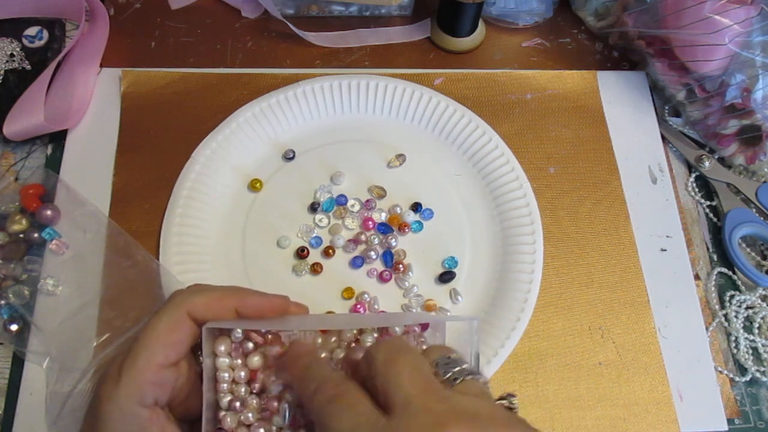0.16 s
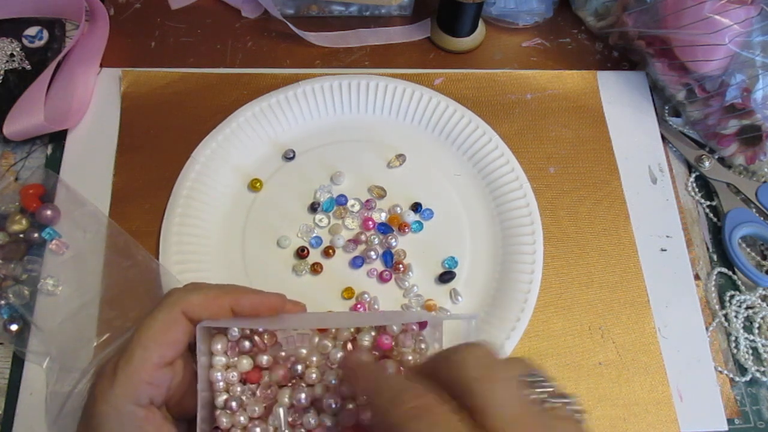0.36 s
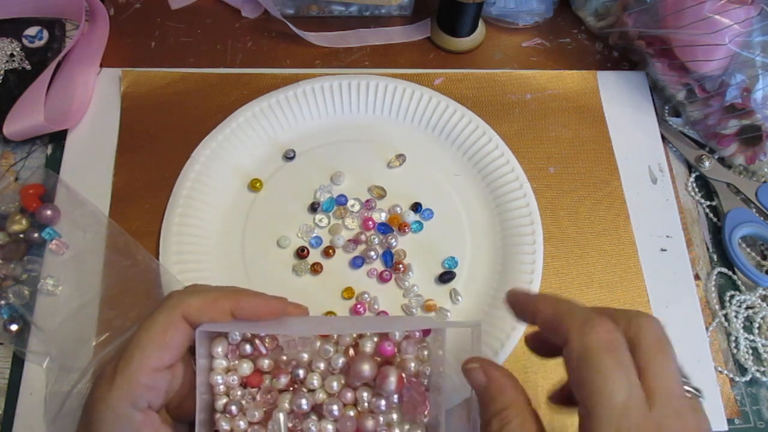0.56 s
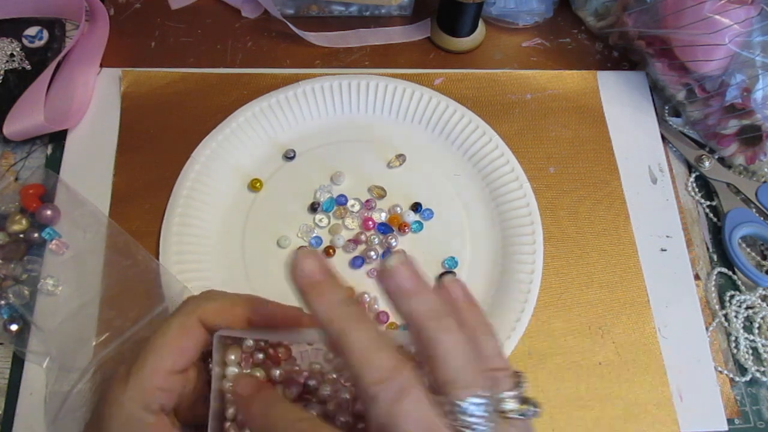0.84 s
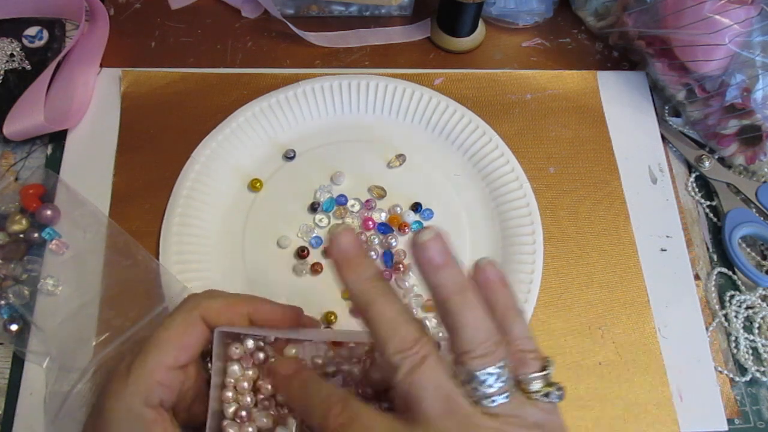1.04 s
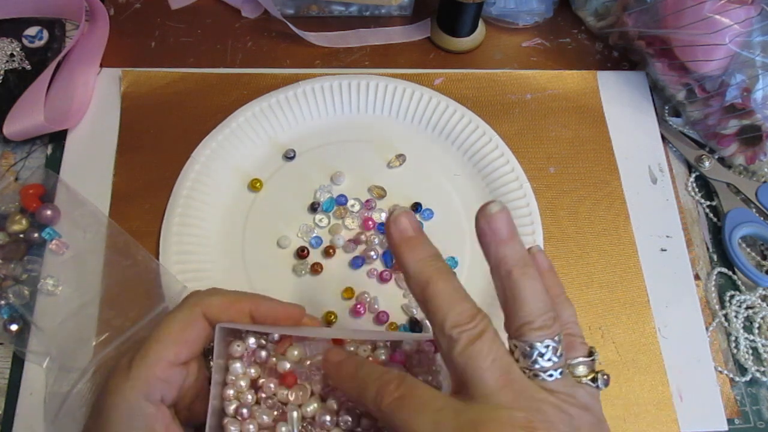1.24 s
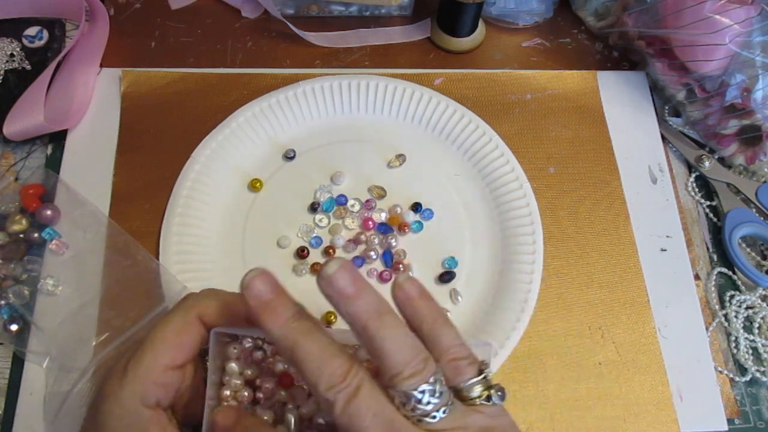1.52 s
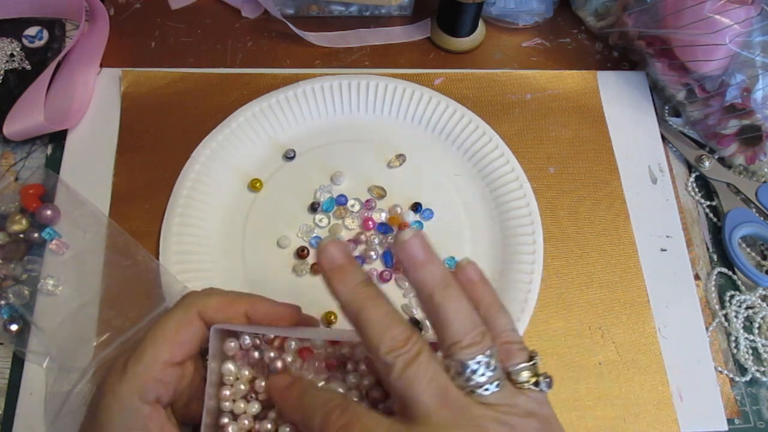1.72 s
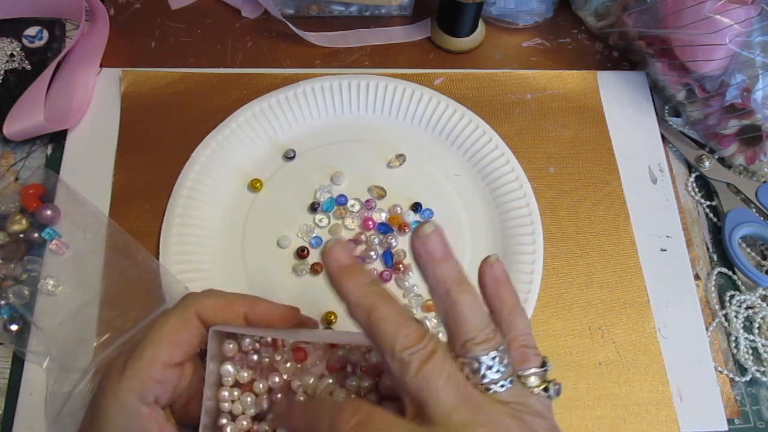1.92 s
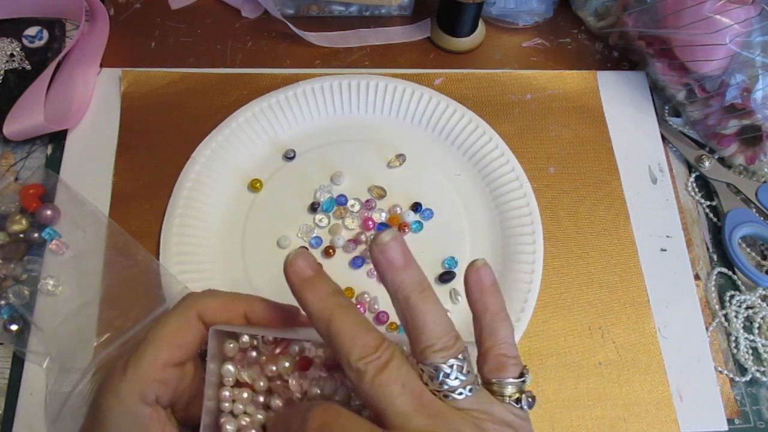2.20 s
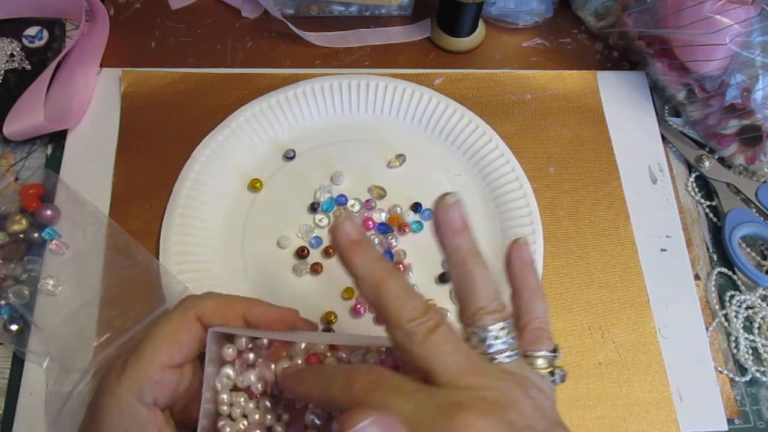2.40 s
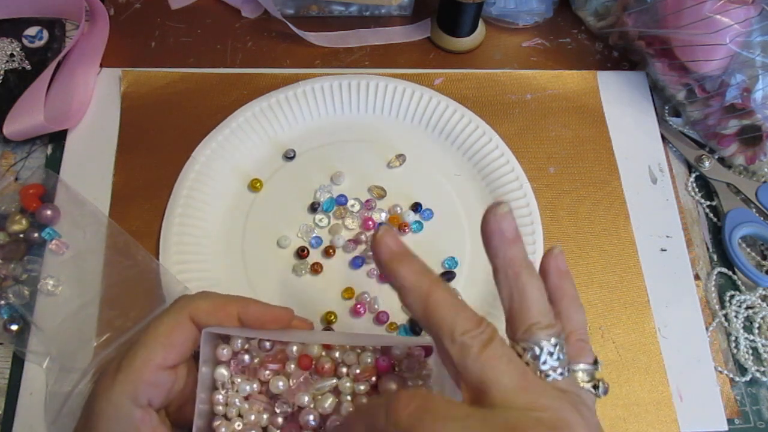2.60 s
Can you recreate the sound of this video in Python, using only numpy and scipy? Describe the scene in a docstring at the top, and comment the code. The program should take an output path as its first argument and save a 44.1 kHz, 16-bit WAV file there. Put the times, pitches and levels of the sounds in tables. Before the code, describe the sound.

Fingers stirring small hard beads in a plastic box, bright clattering in bursts with short pauses

```python
"""Pearl beads stirred in a small box

Fingers rummage through pearl beads in a small plastic box, held over a table in a small room.
Each contact is a short dying tone (the knock of the box) plus filtered noise bursts (the tick of the beads).
Single clicks stand out of a dense random rattle that follows the strokes; box and room ring on briefly.
Low noise makes the rubbing fingers and the quiet background, and a hand bumps the table once."""
import sys
import numpy as np
from scipy import signal
from scipy.fft import rfft, irfft, next_fast_len
from scipy.io import wavfile

SR = 44100
rng = np.random.default_rng(int(sys.argv[2]) if len(sys.argv) > 2 else 0)


def to_wav(s):
    """Save 16-bit WAV."""
    ch = np.atleast_2d(s).T  # columns
    pcm = np.round(np.clip(ch, -1, 1) * 32767)  # PCM
    wavfile.write(sys.argv[1], SR, pcm.astype(np.int16))


N = 121275
TIME = np.arange(N) / SR

# single bead clicks; brightness is the high part of the tick against its low part:
# start_s, knock_level_db, tick_level_db, brightness_db
BEAD_CLICKS = [(0.0331, -20.5, -34, -1), (0.0393, -26, -32, -14), (0.091, -33, -35.5, -5),
               (0.094, -23, -38, -1), (0.1128, -19.5, -25, -5), (0.1323, -14.5, -27, -4),
               (0.1459, -19, -41, -8), (0.1502, -25, -23.5, -3.5), (0.1676, -9.5, -28.5, -14),
               (0.1821, -24, -27, -11), (0.1962, -15.5, -26, -5.5), (0.2168, -22, -30, -1),
               (0.2455, -16, -22.5, -3), (0.272, -21, -42, -5), (0.2943, -34, -30.5, -2.5),
               (0.3107, -34, -35.5, -8), (0.3222, -32, -39, -7), (0.3376, -43, -34.5, -10),
               (0.356, -35, -40, -13), (0.3861, -53, -39, -7), (0.389, -31, -43, -6),
               (0.4178, -31.5, -29.5, 2.5), (0.4407, -42.5, -49, -5), (0.487, -40, -41.5, 7),
               (0.5291, -47.5, -52.5, -11), (0.747, -64, -55.5, -5), (0.9011, -46, -57, -3),
               (0.9193, -28.5, -32.5, -3), (0.9283, -24, -33, -6), (0.9311, -33, -30, -3.5),
               (0.9687, -28, -31, 9), (0.9805, -34, -29, 4), (0.9987, -31, -28, -4),
               (1.0036, -20, -27, -13), (1.0133, -28, -23, -11), (1.0271, -26, -30.5, -10),
               (1.0484, -20.5, -25.5, -10), (1.0558, -22, -22, -1), (1.0642, -22.5, -27, 5),
               (1.0699, -18, -25, -8), (1.0859, -26, -43, -2), (1.0923, -17.5, -36, 0),
               (1.1091, -17, -29.5, -15.5), (1.1203, -25, -32, -12), (1.1338, -27, -29.5, -9),
               (1.1736, -30, -32, -8), (1.1987, -26.5, -30, -8.5), (1.216, -29.5, -49, 1),
               (1.2225, -31, -36.5, 5), (1.3087, -30, -32.5, -12.5), (1.5166, -34.5, -33, -7),
               (1.5212, -16.5, -20.5, 2.5), (1.5629, -20, -30, -3), (1.5704, -29, -26, 4),
               (1.5778, -10.5, -18, -4), (1.5969, -14.5, -23, -2), (1.6116, -23, -21, -10),
               (1.6218, -22, -29, -7), (1.6325, -24, -26.5, -10), (1.6365, -22.5, -26.5, -8),
               (1.6464, -25, -27, -8), (1.6565, -22, -29, -5), (1.6639, -22.5, -26.5, -2),
               (1.6963, -24, -30, -5), (1.7192, -25, -25.5, -3), (1.7225, -21.5, -26.5, -8),
               (1.7586, -22.5, -25.5, 0), (1.776, -26, -25, 4), (1.7939, -31, -33, -9),
               (1.8011, -35, -29, -4), (1.807, -30, -36, 6), (1.8446, -27.5, -38, -9),
               (1.8492, -23.5, -34.5, 8), (1.8696, -24, -30, -1), (1.8719, -6.5, -22.5, -8),
               (1.8797, -25, -31, -15), (1.888, -17, -30, -11), (1.8935, -21, -33, -12),
               (1.9042, -14, -33.5, 3), (1.9375, -28, -35, -2), (1.9478, -20, -28, 0),
               (1.9537, -27, -32, -1), (1.9588, -24.5, -37, -13), (1.9935, -32.5, -34, -8),
               (2.0198, -33.5, -41, -7), (2.0326, -31, -33.5, -6), (2.0444, -31, -38.5, -14),
               (2.0494, -27.5, -37, -10), (2.0708, -30, -43, -14), (2.0834, -25, -31.5, -11),
               (2.1711, -24, -26, -2), (2.1817, -22, -30, -7), (2.1888, -16.5, -28, 7),
               (2.1961, -42, -28.5, 10), (2.1993, -20.5, -28, 0), (2.2419, -21.5, -39, 1),
               (2.2481, -24.5, -33, 3), (2.2905, -24.5, -31, -4), (2.2947, -25, -32, -2),
               (2.3088, -21, -30, -1), (2.3168, -23, -28, -7), (2.3402, -21.5, -35, -6),
               (2.3522, -16, -25, -8.5), (2.3713, -22.5, -31, -1), (2.4383, -22.5, -29, 0),
               (2.4531, -18.5, -30, -6), (2.4559, -14, -25, -4.5), (2.4806, -21.5, -45, -5),
               (2.4978, -25, -29.5, -5), (2.5183, -17, -25, -3.5), (2.5315, -41, -40, -10),
               (2.6417, -39, -37, 0.5), (2.6807, -26, -27.5, -5), (2.7055, -30, -39.5, -9),
               (2.7466, -36, -39, -6)]
# strength of the stirring, one curve for each spell of rummaging: time_s, level_db
STIRRING_SPELLS = [
    [(0, -19), (.02, -39.5), (.085, -46), (.115, -31), (.15, -27), (.21, -24), (.26, -29.5), (.33, -41),
     (.40, -49), (.45, -52)],
    [(.925, -51.5), (.965, -33.5), (1.0, -19.5), (1.03, -27), (1.062, -14.5), (1.085, -23), (1.13, -23.5),
     (1.185, -34), (1.23, -31), (1.28, -43.5), (1.33, -42.5), (1.39, -56)],
    [(1.522, -47), (1.545, -29.5), (1.6, -23), (1.665, -21), (1.71, -29.5), (1.77, -22.5), (1.83, -40.5),
     (1.88, -29), (1.92, -40), (1.96, -27), (2.005, -56), (2.05, -34.5), (2.105, -50), (2.13, -36),
     (2.165, -38)],
    [(2.168, -26), (2.2, -18.5), (2.22, -23), (2.245, -24), (2.275, -33.5), (2.325, -25), (2.385, -24.5),
     (2.425, -31.5), (2.445, -27), (2.49, -42.5), (2.54, -28.5), (2.59, -62)],
    [(2.69, -46), (2.715, -30), (2.75, -37.5)],
]
# tone colour of the box knock: pitch_hz, level_db
KNOCK_COLOUR = [(150, -31.5), (330, -16.5), (650, -6), (900, -2.5), (1450, 4), (1680, 3), (1950, -3.5),
                (3000, 0.5), (6000, -12)]
# tone colour of the lower part of the tick: pitch_hz, level_db
CLACK_COLOUR = [(300, -30.5), (1200, -14), (2100, 1), (2750, 1), (3500, -0.5), (3950, -6), (4600, -4.5),
                (5800, -8), (9000, -45), (16000, -65)]
# tone colour of the higher part of the tick: pitch_hz, level_db
SNAP_COLOUR = [(500, -37), (3000, -37), (5200, -4.5), (6600, 2), (7500, -0.5), (8200, 3), (9300, 0.5),
               (10500, -7.5), (13000, -17.5), (16000, -25)]
# ringing tones of the box, levels before BOX_DB; decay is the time to fall by 60 dB:
# pitch_hz, level_db, decay_s
BOX_TONES = [(810, -55, .08), (1058, -54, .07), (1225, -60, .06), (1442, -48, .09), (1560, -54, .06),
             (1705, -51, .08), (2120, -45, .1), (2435, -51, .08), (2555, -51, .07), (2716, -46, .08),
             (2885, -48, .08), (3610, -49, .07), (4245, -49, .08), (4488, -46, .1)]
# tone colour of the reflections: pitch_hz, level_db
ROOM_COLOUR = [(200, -7), (900, -1.5), (1500, -6), (2600, 2.5), (5000, 3.5), (9000, -3), (16000, 4.5)]
# fingertip taps on the wall of the box: start_s, level_db
FINGER_TAPS = [(0.2241, -34.5), (2.7042, -42.5)]
# tone colour of fingers rubbing among the beads: pitch_hz, level_db
RUB_COLOUR = [(100, -14.5), (250, -13), (420, 1.5), (800, 3.5), (1200, -1), (3000, -31)]
# ringing tones of the table top; decay is the time to fall by 60 dB: pitch_hz, level_db, decay_s
TABLE_TONES = [(39.7, -46, 0.8), (55, -31, 0.22), (78.8, -34.5, 0.3), (135, -45, 0.2), (161.6, -43, 0.27)]
# strength of the noise in the table bump: time_s, level_db
BUMP_LEVEL = [(.39, -88), (.418, -45), (.45, -39.5), (.49, -46.5), (.54, -49), (.59, -58), (.75, -62),
              (.95, -65)]
# tone colour of that noise: pitch_hz, level_db
BUMP_COLOUR = [(10, -22), (28, -8), (42, 2.5), (78, -3.5), (100, -8), (150, -6.5), (240, -11), (400, -16.5),
               (700, -26.5), (2000, -58)]
# strength of the background: time_s, level_db
BACKGROUND_LEVEL = [(0, -55.5), (.9, -55.5), (1.45, -51.5), (1.6, -54), (1.93, -58), (2.4, -60),
                    (2.76, -62.5)]
# tone colour of the background: pitch_hz, level_db
BACKGROUND_COLOUR = [(15, -10), (35, 0), (60, -1), (105, 2), (150, -2.5), (260, -4), (600, -8),
                     (1500, -11.5), (3000, -18), (8000, -22.5), (16000, -30.5)]

REFERENCE_DB = -25  # the level at which the pitch and rate settings below hold
CONTACT_S = .0025   # contact levels are rms over this time
# the knock: middle pitch, random spread, time to its peak; heavier blows sound a little lower
KNOCK_HZ, KNOCK_SPREAD_OCT, KNOCK_RISE_S = 1489, 0.071, 0.00038
HEAVY_DROP_OCT_PER_DB = 0.0118
TICK_DECAY_S = 0.00074  # time to fall to about a third
# the rattle: its rate, and how much of the stirring's swing (in dB) the rate follows
CONTACTS_PER_S, CONTACTS_FOLLOW = 420, .5
RATTLE_KNOCK_DB, RATTLE_TICK_DB, RATTLE_BRIGHT_DB = -6, -9.5, -3.5
SIZE_SPREAD_DB, COLOUR_SPREAD_DB = 2.5, 1
BOX_DB = -7.5
# reflections: levels, times to fall by 60 dB, and the wait before the first one
EARLY_DB, EARLY_T60_S, ROOM_DB, ROOM_T60_S, FIRST_ECHO_S = -5, 0.04, -10, 0.25, 0.0023
# rubbing: its level at the reference, and its share of the stirring's swing
RUB_DB, RUB_FOLLOWS = -50.5, 0.73
TAP_HZ, TAP_RISE_S = 471, 0.0019
BUMP_S, BUMP_RISE_S = .439, 0.005  # start and softness of the table's ringing
CLIP_TOP = 2        # loudest possible amplitude before the treble cut
CUTOFF_HZ = 15800


def from_db(db):
    """Turn decibels into a plain gain."""
    return 10 ** (np.asarray(db) / 20)


def unit_energy(x):
    """Scale each row so that its squares add up to 1."""
    return x / np.sqrt(np.sum(x ** 2, axis=-1, keepdims=True) + 1e-20)


def coloured(x, points):
    """Filter each row through (Hz, dB) points, with no sound ahead of its cause (minimum phase)."""
    length = x.shape[-1]
    size = 2 * next_fast_len(length)
    hz, db = np.transpose(points)
    grid_hz = np.maximum(np.arange(size // 2 + 1) * SR / size, 1)
    gain = from_db(np.interp(np.log(grid_hz), np.log(hz), db))
    # folding the cepstrum (the spectrum of the log gain) forward gives the minimum phase
    cepstrum = irfft(np.log(gain))
    cepstrum[1:size // 2] *= 2
    cepstrum[size // 2 + 1:] = 0
    response = np.exp(rfft(cepstrum))
    return irfft(rfft(x, size) * response)[..., :length]


def noise(points):
    """Coloured noise with an rms of 1."""
    return unit_energy(coloured(rng.standard_normal(N), points)) * np.sqrt(N)


def level_db(curve):
    """A level curve in time, practically silent outside its span."""
    return np.interp(TIME, *np.transpose(curve), left=-120, right=-120)


def stirring_db():
    """How hard the fingers stir: the strongest spell at each moment."""
    return np.max([level_db(curve) for curve in STIRRING_SPELLS], axis=0)


def beads(count=7):
    """Contacts are dealt to several places in the box, each with reflections of its own."""
    rows = np.vstack([BEAD_CLICKS, rattle()])
    places = [room(contacts(rows[k::count])) for k in range(count)]
    return box(sum(places))


def rattle(count=6000):
    """Rows of random small contacts, thicker and stronger as the fingers push harder."""
    place, luck = rng.random((2, count))
    size, knock, tick, bright = np.clip(rng.standard_normal((4, count)), -2, 2)
    at = ((np.arange(count) + place) * (N - 1) / count).astype(int)
    stir_db = stirring_db()[at]
    rate = CONTACTS_PER_S * from_db(CONTACTS_FOLLOW * (stir_db - REFERENCE_DB))
    # more contacts share the same power, so each one is weaker
    db = stir_db - 10 * np.log10(rate * CONTACT_S) + SIZE_SPREAD_DB * (size - .5)
    knock_db = db + RATTLE_KNOCK_DB + COLOUR_SPREAD_DB * knock
    tick_db = db + RATTLE_TICK_DB + COLOUR_SPREAD_DB * tick / 2
    bright_db = RATTLE_BRIGHT_DB + COLOUR_SPREAD_DB * bright
    rows = np.column_stack([at / SR, knock_db, tick_db, bright_db])
    # chance silences contacts until the wanted rate is left
    silenced = luck > rate * N / SR / count
    rows[silenced, 1:3] = -150
    return rows


def contacts(rows, size=256):
    """Each contact: a few cycles of box knock at its own pitch, and a tick of lower clack and higher snap."""
    s, knock_db, tick_db, bright_db = np.transpose(rows)[:, :, None]
    t = np.arange(size) / SR
    chance = rng.standard_normal((len(rows), 2 * size + 1))
    # the last column picks the pitch, the others are the noise of clack and snap
    spread_oct = KNOCK_SPREAD_OCT * np.tanh(chance[:, -1:])
    drop_oct = HEAVY_DROP_OCT_PER_DB * (knock_db - REFERENCE_DB)
    hz = KNOCK_HZ * 2 ** (spread_oct - drop_oct)
    tone = -t * np.exp(-t / KNOCK_RISE_S) * np.sin(2 * np.pi * hz * t)
    knock = unit_energy(coloured(tone, KNOCK_COLOUR))
    burst = np.exp(-t / TICK_DECAY_S)
    clack = unit_energy(coloured(chance[:, :size] * burst, CLACK_COLOUR))
    snap = unit_energy(coloured(chance[:, size:-1] * burst, SNAP_COLOUR))
    waves = (from_db(knock_db) * knock
             + from_db(tick_db - bright_db / 2) * clack
             + from_db(tick_db + bright_db / 2) * snap)
    # add every wave at its own start
    at = np.maximum(s * SR, 0).astype(int) + np.arange(size)
    return np.bincount(at.ravel(), waves.ravel(), N)[:N] * np.sqrt(CONTACT_S * SR)


def box(x):
    """The walls of the box ring on after each contact, as a sum of dying tones."""
    t = TIME[:SR // 4]
    ringing = sum(from_db(db - 60 * t / t60) * np.cos(2 * np.pi * hz * t)
                  for hz, db, t60 in BOX_TONES)
    return x + from_db(BOX_DB) * signal.fftconvolve(x, ringing)[:N]


def room(x):
    """Quick reflections from box, hands and table, then the tail of the room, both of dying noise."""
    t = TIME[:SR // 2]
    early, late = rng.standard_normal((2, len(t))) * (t > FIRST_ECHO_S)
    early = unit_energy(early * from_db(-60 * t / EARLY_T60_S))
    late = unit_energy(late * from_db(-60 * t / ROOM_T60_S))
    response = from_db(EARLY_DB) * early + from_db(ROOM_DB) * late
    return x + signal.fftconvolve(x, coloured(response, ROOM_COLOUR))[:N]


def fingers():
    """Dull rubbing under the rattle, and soft hollow taps on the wall of the box."""
    rub_db = RUB_DB + RUB_FOLLOWS * (stirring_db() - REFERENCE_DB)
    rub = from_db(rub_db) * noise(RUB_COLOUR)
    s, db = np.transpose(FINGER_TAPS)[:, :, None]
    age = np.maximum(TIME - s, 0)
    swell = age / TAP_RISE_S * np.exp(1 - age / TAP_RISE_S)
    taps = from_db(db) * swell * np.sin(2 * np.pi * TAP_HZ * age)
    return rub + room(taps.sum(axis=0))


def bump():
    """A soft thud of a hand on the table: the top rings low and dies into a faint rumble."""
    age = np.maximum(TIME - BUMP_S, 0)
    top = sum(from_db(db - 60 * age / t60) * np.sin(2 * np.pi * hz * age)
              for hz, db, t60 in TABLE_TONES)
    soft_start = 1 - np.exp(-age / BUMP_RISE_S)
    rumble = from_db(level_db(BUMP_LEVEL)) * noise(BUMP_COLOUR)
    return top * soft_start + rumble


def background():
    """Quiet, mostly low noise whose level drifts slowly."""
    db = np.interp(TIME, *np.transpose(BACKGROUND_LEVEL))
    return from_db(db) * noise(BACKGROUND_COLOUR)


def scene():
    """Beads, fingers and the bump on the table, over a quiet background, in one channel."""
    return (beads() + fingers() + bump() + background())[None]


def record(dry):
    """The hardest clicks are rounded off and the highest treble is cut."""
    rounded = dry / (1 + (dry / CLIP_TOP) ** 4) ** .25
    treble_cut = signal.ellip(10, .1, 70, CUTOFF_HZ, fs=SR, output="sos")
    return signal.sosfilt(treble_cut, rounded)


dry = scene()
out = record(dry)
to_wav(out)
```